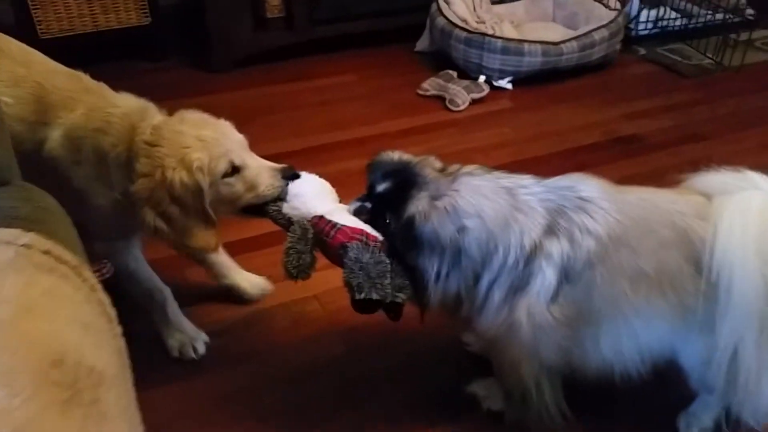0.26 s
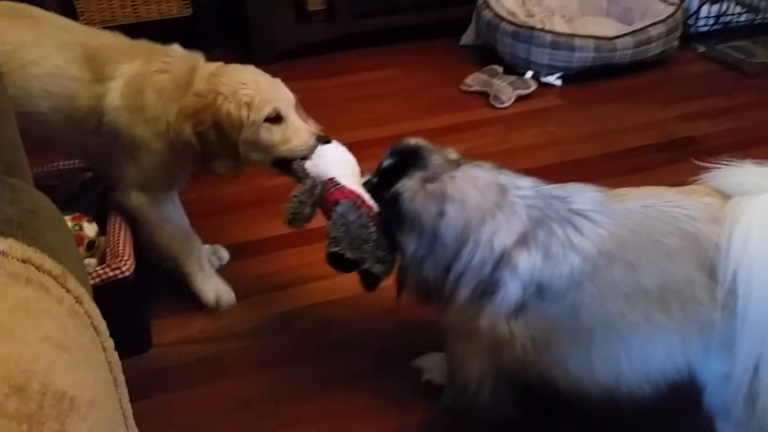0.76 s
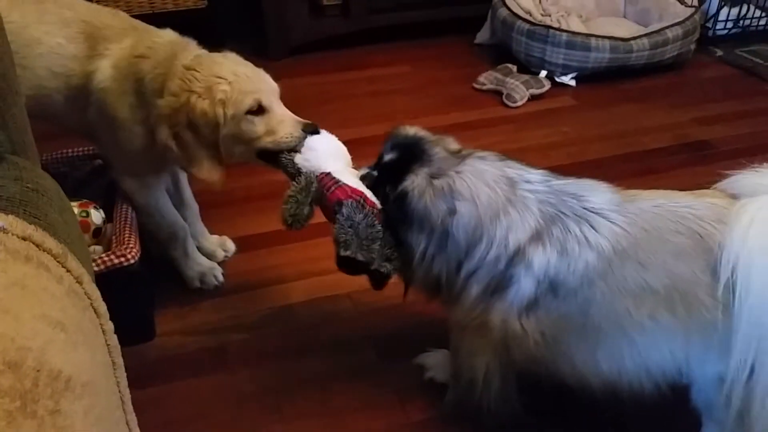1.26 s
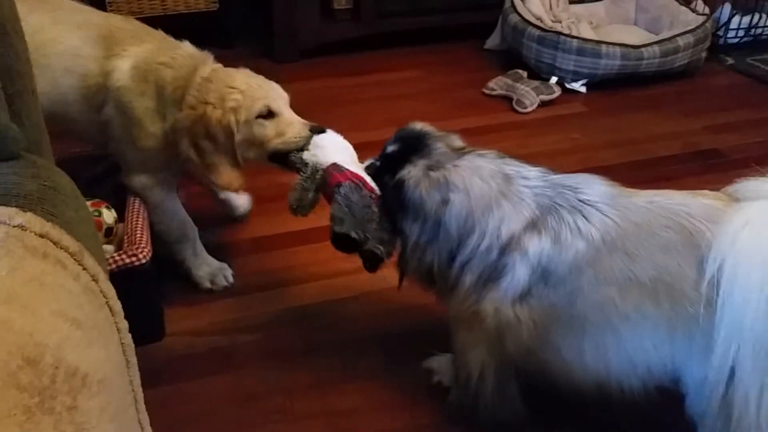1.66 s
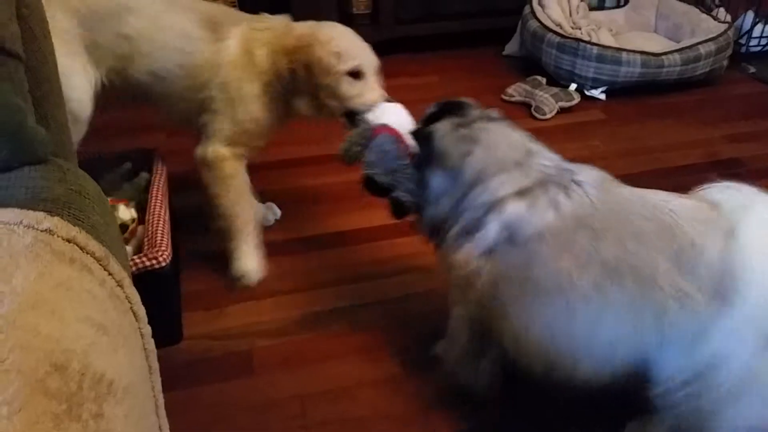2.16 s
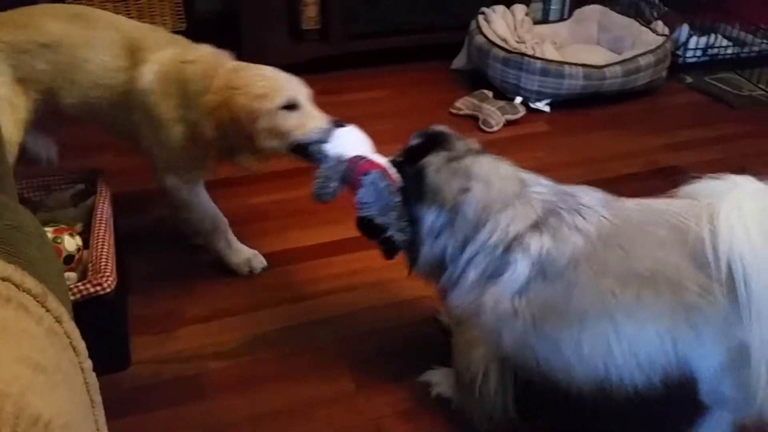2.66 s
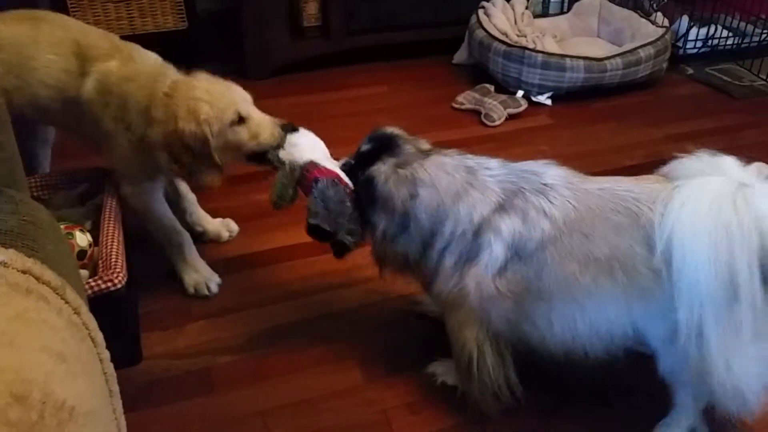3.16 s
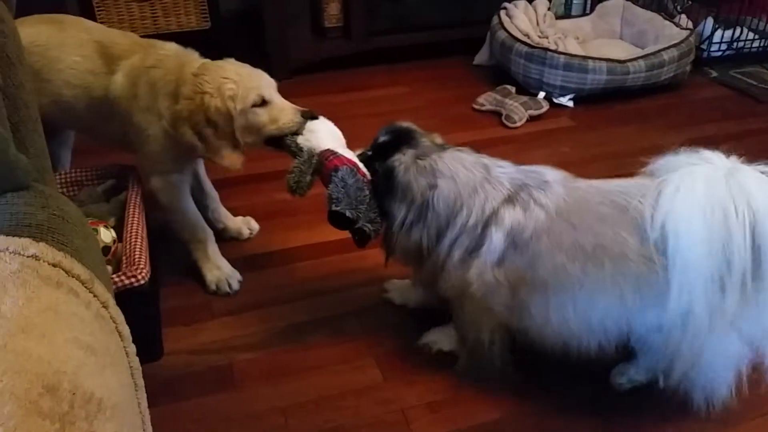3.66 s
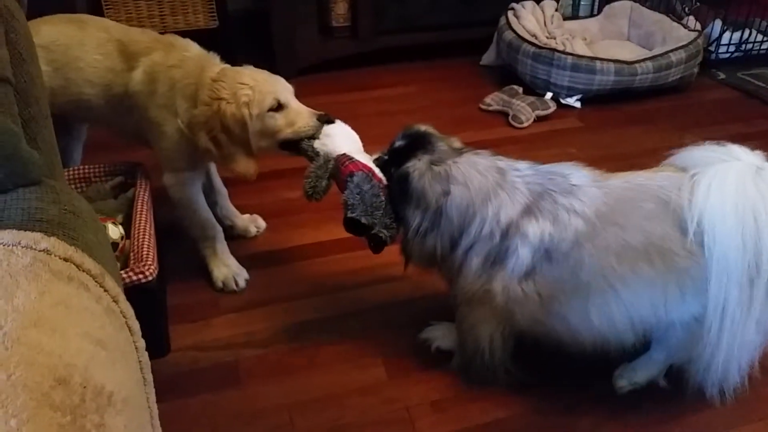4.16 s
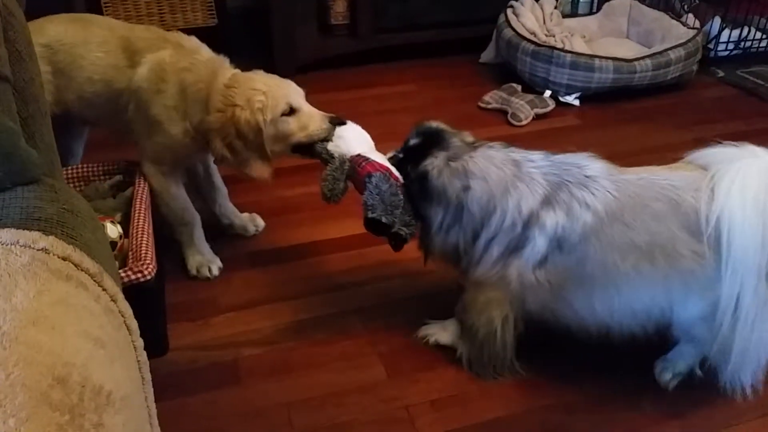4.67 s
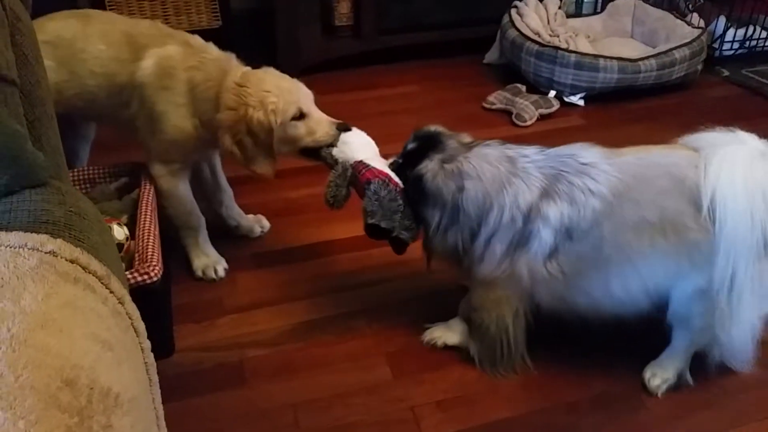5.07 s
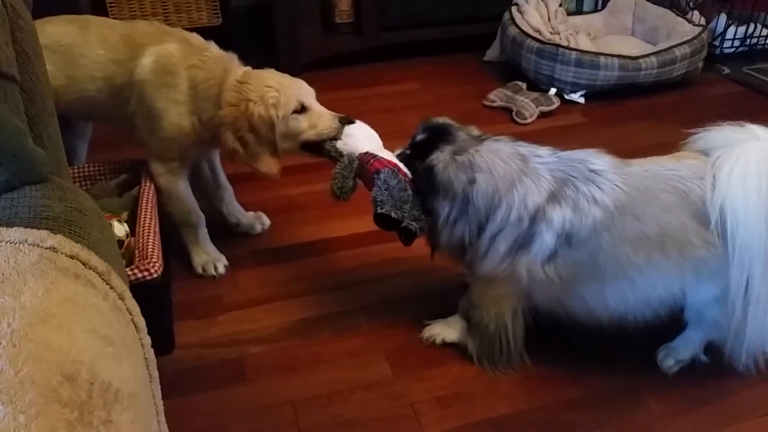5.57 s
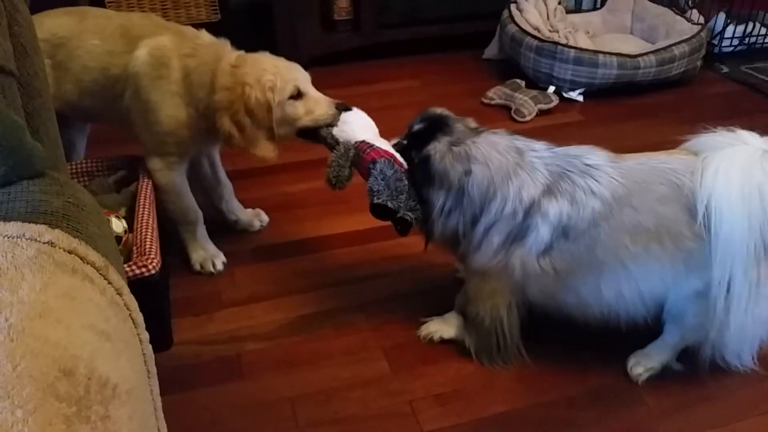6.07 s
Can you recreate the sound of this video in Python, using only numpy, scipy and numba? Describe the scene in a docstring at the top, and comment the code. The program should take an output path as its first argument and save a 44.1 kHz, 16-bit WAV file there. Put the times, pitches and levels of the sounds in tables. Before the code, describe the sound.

Low throaty play growls from two dogs overlap in a small room, with faint paw scuffs, soft rustling and microphone bumps.

```python
"""Two dogs growl over a plush toy on a wooden floor. One throbs about twenty times a second: its throat
gates the voice. The other growls evenly along pitch arches. Both: fold slaps and air puffs through throat
resonances. Claws tick and scuff (filtered noise), noses snort, fur and plush rustle, the room reflects.
The hand holding the phone bumps its left microphone (damped thuds) over grip rumble and quiet room tone."""
import sys
import numpy as np
from scipy import signal
from scipy.fft import rfft, irfft
from scipy.io import wavfile
from scipy.ndimage import uniform_filter1d
from numba import njit

SR = 44100
rng = np.random.default_rng(int(sys.argv[2]) if len(sys.argv) > 2 else 0)


def wav_record(signal):
    """Record a signal, one row per channel, as 16-bit PCM in the file named by sys.argv[1]."""
    frames = np.transpose(np.atleast_2d(signal))
    bounded = np.clip(frames, -1, 1)
    # unit amplitude maps onto the largest positive 16-bit level
    quanta = np.round(bounded * 32767).astype(np.int16)
    wavfile.write(sys.argv[1], SR, quanta)


N = 278271
T = np.arange(N) / SR  # s

# Room air spectrum: hz, relative_db
ROOM_TONE_SPECTRUM = [(25, -5), (60, -2), (110, 2.5), (200, -21.5), (400, -15.5), (1000, -26.5),
                      (2400, -37), (3300, -44.5), (4500, -35.5), (5700, -50), (7000, -83.5), (9500, -51),
                      (14500, -44.5)]
# Background hiss level, sinking near the end: time_s, level_db
AIR_LEVEL = [(0, -46), (2.6, -47.5), (5.85, -48), (6.1, -54), (6.3, -57)]
# Fur and plush rub spectrum: hz, relative_db
RUSTLE_SPECTRUM = [(150, -26.5), (450, 0), (1000, -0.5), (1700, -10), (2400, -10.5), (3400, -30),
                   (6000, -61.5)]
# Microphone difference: hz, left_minus_right_db
PORT_DIFFERENCE = [(120, -2), (300, -1.5), (650, 1.5), (1300, 1), (2400, 7.5), (4400, 0), (9000, 8.5),
                   (10500, 16.5), (12500, -2.5), (14500, -4.5)]
# Grip rumble spectrum: hz, relative_db
RUMBLE_SPECTRUM = [(20, -11.5), (45, 1), (75, -0.5), (120, -1.5), (250, -14), (600, -83)]
# Hand bumps on the phone: centre_s, level_db (before panning), pitch_hz
BUMPS = [(0.131, -16.5, 139), (0.167, -18, 148), (0.198, -18, 136), (0.216, -22, 107), (0.281, -28, 101),
         (0.331, -17.5, 129), (0.393, -20, 129), (0.442, -20, 113), (0.463, -19.5, 64.7),
         (0.469, -15, 179.7), (0.487, -18, 91), (1.058, -25.5, 65), (1.531, -21.5, 65.6), (2.212, -15, 91),
         (2.562, -27.5, 73.7), (2.645, -23, 69.8), (5.453, -20, 75.4), (5.957, -23.5, 80.14),
         (6.042, -25, 91.3)]
# Claw contact spectrum: hz, gain_db
CLAW_SPECTRUM = [(300, 19), (1200, 1), (2600, -6.5), (4000, -7.5), (6000, -20), (8200, -12), (11000, -6.5),
                 (14500, -8)]
# Claws and knocks on the boards: start_s, level_db (before the claw spectrum), lowpass_hz
TICKS = [(0.277, -43, 2460), (.597, -34.5, 12000), (2.196, -39, 14230), (2.2029, -35.5, 14800),
         (3.314, -36.5, 8750), (3.354, -35, 5930), (4.418, -40.5, 12030), (4.425, -40.5, 12200)]
# Sliding paws: start_s, length_s, level_db
SCUFFS = [(0.527, 0.29, -48.5), (1.989, 0.25, -50.5), (2.159, 0.42, -57.5), (3.263, 0.24, -51),
          (4.4, 0.081, -56), (5.862, 0.21, -63.5)]
# Nose air: start_s, length_s, start_level_db, resonance_hz
SNORTS = [(2.223, 0.32, -65.5, 2210), (2.632, 0.028, -55.5, 1266), (5.902, 0.17, -64, 1230),
          (6.152, 0.053, -58, 1262)]
# Air past teeth and toy: hz, relative_db
HISS_SPECTRUM = [(2000, -7.5), (3300, -10), (4500, 10), (5700, 4.5), (7000, -49.5), (9300, 9), (10300, 2.5),
                 (11900, -3.5), (13400, 11), (14500, 13)]
# Even dog's throat resonances: hz, relative_db
EVEN_THROAT = [(60, -22), (102, 4), (220, 3.5), (310, -5.5), (405, -18.5), (510, -18.5), (620, -18.5),
               (760, -13.5), (1050, -15.5), (1330, -14.5), (1650, -37), (1950, -37.5), (2300, -45.5),
               (2550, -46.5), (2950, -46), (3400, -50), (6000, -92)]
# Even dog's pitch arches: start_s, crest_s, end_s, start_hz, crest_hz, end_hz,
# crest_level_db, mouth_opening_db, snarl_db (at the crest)
EVEN_GROWLS = [(-.1, -0.021, 0.18, 128, 133.7, 104.8, -28.5, 2, -32.5),
               (0.549, 0.628, 0.79, 110.7, 126, 96.3, -31, 2.5, -26),
               (1.031, 1.223, 1.3, 100.6, 111.8, 101.7, -34.5, -1.5, -32),
               (1.679, 1.918, 2.167, 119.3, 146, 108.5, -27.5, 4, -25.5),
               (2.653, 2.82, 3.03, 105.5, 109.8, 89.7, -32.5, 2, -24.5),
               (3.021, 3.177, 3.32, 87.14, 98.9, 78.93, -36, 0, -30.5),
               (3.9, 4.17, 4.5, 86.97, 90.16, 86.7, -32.5, -9, -51),
               (4.724, 5.063, 5.33, 106, 119.1, 95.4, -30.5, 0, -31),
               (5.282, 5.328, 5.7, 95.1, 94.03, 86.8, -32.5, -4.5, -38.5),
               (5.622, 5.773, 5.885, 97.3, 111.4, 101.4, -33, -1, -37.5),
               (6.152, 6.342, 6.72, 91.9, 139.7, 120.5, -27, 0, -32.5)]
# Throbbing dog's throat resonances: hz, relative_db
THROB_THROAT = [(70, -18.5), (132, 3), (172, 8.5), (215, 5.5), (290, -3.5), (410, -20), (510, -12),
                (615, -7.5), (730, -9.5), (860, -17.5), (1230, -25), (1500, -19.5), (1850, -39),
                (2500, -47.5), (3200, -65), (6000, -97)]
# Throbbing dog's mouth opening: time_s, opening_db
THROB_MOUTH = [(.6, 0.5), (2.48, -1.5), (3.6, 0.5), (5.15, 4), (5.85, -7)]
# Throb rate, one list per long growl: time_s, throbs_per_s
THROB_RATES = [
    [(0.585, 20.71), (0.748, 24.88), (0.82, 19.84), (1.043, 19.17), (1.113, 20.75), (1.199, 19.11),
     (1.445, 18.46), (1.562, 18.64), (1.633, 17.33), (1.822, 20.19), (1.904, 16.84), (1.982, 22.96),
     (2.053, 22.66), (2.21, 20.2), (2.285, 14.21), (2.48, 17.29)],
    [(3.3, 22.12), (3.557, 21.86), (3.627, 20.19), (3.805, 18.95), (4.0, 15.32), (4.08, 20.28),
     (4.348, 15.93), (4.48, 18.57), (4.568, 17.64), (4.899, 16.35), (4.97, 18.9), (5.219, 18.2),
     (5.472, 14.3), (5.632, 17.97), (5.717, 14.32), (5.865, 15.67)],
]
# Voice course, one list per long growl: time_s, base_pitch_hz, relative_level_db
THROB_GROWLS = [
    [(.583, 119.6, -25.5), (.66, 137.8, -24), (.8, 121.2, -24), (1.02, 110, -25.5), (1.12, 109.6, -22),
     (1.3, 130.7, -22), (1.45, 121.2, -25), (1.62, 116.9, -23), (1.94, 142.8, -23.5), (2.19, 128.4, -20.5),
     (2.28, 111.5, -26.5), (2.41, 110.5, -27), (2.48, 100.8, -34)],
    [(3.298, 126.4, -26), (3.39, 134.1, -23), (3.66, 132, -24.5), (4.0, 127.1, -26.5), (4.35, 122.7, -26.5),
     (4.55, 125.3, -26), (4.7, 113.4, -28), (4.87, 110.6, -28.5), (5.1, 123.2, -25.5), (5.33, 117.9, -26),
     (5.58, 105.5, -29), (5.865, 105.9, -26.5)],
]

TOP_HZ = 14650
GRIP_DB, GRIP_SETTLE_DB_PER_S = -31, 2  # the grip rumbles less as the hand settles
BUMP_PAN_DB = 35  # left minus right
LOW_HZ, LOW_ROUGH, ROUGH_PER_OCTAVE = 91.9, .19, .95  # even dog: the higher, the rougher
SWELL_DB_PER_OCTAVE = 37  # even dog: level follows pitch relative to the crest
NASAL_HZ, NASAL_HZ_PER_OCTAVE, NASAL_WIDTH_HZ = 2228, 377, 335  # NASAL_HZ holds at LOW_HZ
THROB_ROUGH, ONSET_ROUGH, ONSET_S = .35, .42, .16  # base, extra at each onset, its decay


def undb(db):
    """Decibels to gain."""
    return 10 ** (np.asarray(db) / 20)


def unit(x):
    """Scale to rms 1."""
    return x / np.sqrt(np.mean(x ** 2) + 1e-18)


def curves(rows):
    """Table columns joined by straight lines in time."""
    time_s, *columns = np.transpose(rows)
    return [np.interp(T, time_s, column) for column in columns]


def colour(x, points):
    """Minimum-phase filter through (hz, db) points, by folding the cepstrum."""
    size = 8192
    hz, db = np.transpose(points)
    log_hz = np.log(np.fft.rfftfreq(size, 1 / SR) + 1)
    cepstrum = irfft(np.log(undb(np.interp(log_hz, np.log(hz), db))))
    cepstrum[1:size // 2] *= 2
    cepstrum[size // 2 + 1:] = 0
    impulse = irfft(np.exp(rfft(cepstrum)))
    return signal.fftconvolve(x, impulse)[:len(x)]


def coloured_noise(points):
    """Noise of rms 1 with a given spectrum."""
    return unit(colour(rng.standard_normal(N), points))


def above(x, hz):
    """Zero-phase high-pass."""
    return signal.sosfiltfilt(signal.butter(2, hz, "high", fs=SR, output="sos"), x)


def walk(rate_hz):
    """Smoothed random steps of rms 1."""
    step = int(SR / rate_hz)
    steps = np.repeat(rng.standard_normal(N // step + 2), step)
    return unit(uniform_filter1d(steps, step)[:N])


def gate(start_s, end_s, attack_s, release_s):
    """Linear attack, hold and release."""
    return np.clip(np.minimum((T - start_s) / attack_s, (end_s - T) / release_s), 0, 1)


def pan(db):
    """Left and right gains with a mean of 1."""
    left = undb(db)
    return 2 * np.array([[left], [1]]) / (1 + left)


def add(out, start_s, sound):
    """Mix a stereo sound in at a time."""
    i = max(int(start_s * SR), 0)
    out[:, i:i + sound.shape[1]] += sound[:, :max(N - i, 0)]


@njit
def resonance(x, hz, width_hz):
    """State-variable band-pass with a moving centre, gain 1 there."""
    y, band, low = np.empty(len(x)), 0., 0.
    for i in range(len(x)):
        g, damping = np.tan(np.pi * hz[i] / SR), width_hz / hz[i]
        v = (band + g * (x[i] - low)) / (1 + g * (g + damping))
        band, low, y[i] = 2 * v - band, low + 2 * g * v, damping * v
    return y


def narrow(x, hz, width_hz):
    """A resonance applied twice for steep sides, scaled to rms 1."""
    hz = hz * np.ones(N)
    once = resonance(x, hz, 1. * width_hz)
    return unit(resonance(once, hz, 1. * width_hz))


def room_tone():
    """Quiet air of the house, independent in each channel."""
    noise = np.array([coloured_noise(ROOM_TONE_SPECTRUM) for _ in range(2)])
    return undb(curves(AIR_LEVEL)[0]) * noise


def reflections(x, t60_s=.36, late_t60_s=.4, late_db=-17, treble_loss=.25, wet_db=-3,
                bass_wet_db=-12, bass_hz=450, gap_s=.0018):
    """Floor and furniture scatter sound into decaying noise tails; channels differ most in the highs."""
    t = T[:SR // 2]
    early, late = (np.exp(-np.log(1000) * t / s) for s in (t60_s, late_t60_s))
    decay = (early + undb(late_db) * late) * (t > gap_s)
    tails = decay * rng.standard_normal((2, len(t))) / np.sqrt(np.sum(decay ** 2))
    tails = tails - treble_loss * above(tails, 2400)
    upper = above(tails, bass_hz)
    mid, side = undb(bass_wet_db) * (tails - upper) + undb(wet_db) * upper
    side = .6 * side + .95 * above(side, 1500)
    mid, side = (signal.fftconvolve(x, tail)[:N] for tail in (mid, side))
    return mid + side * np.array([[1], [-1]])


def room(x, count=4):
    """As the dogs move about, one pattern of reflections gives way to the next."""
    place = np.linspace(0, count - 1, N)
    weights = [np.cos(np.pi / 2 * np.clip(place - k, -1, 1)) for k in range(count)]
    return x + sum(reflections(x * weight) for weight in weights)


def ports(x):
    """The left microphone favours upper resonances, the right one the lows and the very top."""
    halves = [[(hz, sign * db / 2) for hz, db in PORT_DIFFERENCE] for sign in (1, -1)]
    return np.array([colour(channel, half) for channel, half in zip(x, halves)])


def rustle(db=-63, uneven_db=6.5, rate_hz=14):
    """Fur and plush rub in fits and starts as the dogs shift their grip."""
    rubs = np.array([coloured_noise(RUSTLE_SPECTRUM) for _ in range(2)])
    air_change_db = curves(AIR_LEVEL)[0] - AIR_LEVEL[0][1]
    return rubs * undb(db + uneven_db * walk(rate_hz) + air_change_db)


def hand(cycles=.33, case_hz=260, case_s=.0011, case_db=-18, right_db=-6):
    """Finger bumps: a dull thud of about one cycle and a brief case knock, over low grip rumble."""
    out, t = np.zeros((2, N)), T[:SR // 10] - T[SR // 20]
    knock = undb(case_db) * np.exp(-.5 * (t / case_s) ** 2) * np.sin(2 * np.pi * case_hz * t)
    for centre_s, db, hz in BUMPS:
        thud = np.exp(-.5 * (t * hz / cycles) ** 2) * np.cos(2 * np.pi * hz * t)
        # quicker bumps reach the case more
        bump = thud + (hz / 130) ** 2 * knock
        add(out, centre_s + t[0], undb(db) * pan(BUMP_PAN_DB) * bump)
    left, own = (coloured_noise(RUMBLE_SPECTRUM) for _ in range(2))
    # the deepest rumble stays on the held side
    right = undb(right_db) * above(.31 * left + own, 50)
    return out + undb(GRIP_DB - GRIP_SETTLE_DB_PER_S * T) * np.array([left, right])


def scuff_grains():
    """Fine grains: noise of random strength through the claw spectrum."""
    strength_db = 3.6 * np.minimum(rng.exponential(size=N), 2 * np.pi)
    return unit(colour(rng.standard_normal(N) * undb(strength_db), CLAW_SPECTRUM))


def paws(click_s=.0012, tail_s=.015, tail_db=-13):
    """Claws strike the boards with a short crack; sliding paws make a patch of fine grains."""
    out, t = np.zeros((2, N)), T[:SR // 10]
    decay = np.exp(-t / click_s) + undb(tail_db) * np.exp(-t / tail_s)
    for start_s, db, lowpass_hz in TICKS:
        # a softer contact loses the treble
        contact = signal.butter(2, lowpass_hz, fs=SR, output="sos")
        cracks = signal.sosfilt(contact, decay * rng.standard_normal((2, len(t))))
        add(out, start_s, undb(db) * np.array([colour(crack, CLAW_SPECTRUM) for crack in cracks]))
    grains = np.array([scuff_grains() for _ in range(2)])
    for start_s, length_s, db in SCUFFS:
        out += undb(db) * grains * np.sin(np.pi * np.clip((T - start_s) / length_s, 0, 1))
    return out


def snorts(width_hz=420, edge_s=.012, fade_db=7):
    """Air forced through a dog's nose rings one resonance and dies away."""
    out = np.zeros(N)
    for start_s, length_s, db, hz in SNORTS:
        level_db = db - fade_db * np.clip((T - start_s) / length_s, 0, 1)
        flow = undb(level_db) * gate(start_s, start_s + length_s, edge_s, edge_s)
        out += flow * narrow(rng.standard_normal(N), hz, width_hz)
    return out


def folds(hz, rough, jitter, waver, puff_s, restarts=(0,), shimmer_db=3.2):
    """Vocal folds slap shut once a cycle, unevenly when rough; each slap starts a decaying air puff."""
    first, pause = .6, .1  # cycles: delay after a restart, silence before the next
    rough = np.clip(rough, .08, 1)
    phase = np.cumsum(hz * (1 + waver * rough * walk(70))) / SR
    bounds = phase[[*restarts, -1]]
    cycle = np.concatenate([np.arange(a + first, b - pause) for a, b in zip(bounds, bounds[1:])])
    late, size = rng.standard_normal((1200, 2))[:len(cycle)].T
    uneven = np.interp(cycle, phase, rough)
    at = np.interp(cycle + jitter * uneven * late, phase, np.arange(N))
    slaps = np.zeros(N)
    slaps[at.astype(int)] = -undb(shimmer_db * uneven * np.clip(size, -2, 2))
    puff_flow = signal.lfilter([1], [1, -np.exp(-1 / (puff_s * SR))], slaps)
    return unit(slaps), unit(puff_flow * rng.standard_normal(N))


def restless(x, throat, stretch=.035, tugs_per_s=6):
    """The throat stretches and shortens as the dog tugs, so its resonances wander."""
    long, short = (colour(x, [(hz * k, db) for hz, db in throat]) for k in (1 - stretch, 1 + stretch))
    return long + (.5 + .5 * np.tanh(walk(tugs_per_s))) * (short - long)


def voice(slaps, puffs, rough, throat, mouth_db, rasp, chest_rasp, snarl, hiss_db, lift=1.):
    """Slaps and rasping air ring the throat; an open mouth lets out the upper resonances, highest most."""
    rough = np.clip(rough, .08, 1)
    high, air = above(slaps, 390), above(puffs, 330)
    low = slaps - high + chest_rasp * rough * (puffs - air)
    raspy = (high + rasp * rough * air) / np.sqrt(1 + (rasp * rough) ** 2)
    sound = unit(restless(low + raspy, throat))
    upper = above(sound, 670)
    chest = sound - upper
    # pushing harder also shifts the lowest resonance upwards
    sound = sound + lift * (rough - .4) * (2 * above(chest, 190) - chest)
    sound = sound + (undb(mouth_db) - 1) * upper
    sound = sound + (undb(snarl * mouth_db) - 1) * above(sound, 2500)
    return sound + undb(hiss_db + .86 * mouth_db) * unit(colour(puffs, HISS_SPECTRUM))


def nasal_edge(slaps, puffs, hz, upper_db=-5):
    """Bared teeth let out two narrow nasal resonances, rung by every slap and rising with the pitch."""
    nasal_hz = NASAL_HZ + NASAL_HZ_PER_OCTAVE * np.log2(hz / LOW_HZ)
    lower = narrow(slaps + .57 * puffs, nasal_hz, NASAL_WIDTH_HZ)
    upper = narrow(slaps + .5 * puffs, 1.143 * nasal_hz, .93 * NASAL_WIDTH_HZ)
    return unit(lower + undb(upper_db) * upper)


def even_dog(attack_s=.024, release_s=.023, jaw_s=.063, bare_db=5):
    """Growls swell and sink along pitch arches; cleaner when low, ragged when pushed higher."""
    flow, hz = np.zeros(N), np.full(N, 1. * LOW_HZ)
    mouth_db, snarl_db = np.zeros(N), np.zeros(N)
    for start_s, crest_s, end_s, start_hz, crest_hz, end_hz, db, opening_db, teeth_db in EVEN_GROWLS:
        before = np.interp(T, [start_s, crest_s], [1, 0]) ** 2
        after = np.interp(T, [crest_s, end_s], [0, 1]) ** 2
        arch_hz = crest_hz + (start_hz - crest_hz) * before + (end_hz - crest_hz) * after
        level_db = db + SWELL_DB_PER_OCTAVE * np.log2(arch_hz / crest_hz)
        flow = np.maximum(flow, gate(start_s, end_s, attack_s, release_s) * undb(level_db))
        begun = T >= start_s
        hz = np.where(begun, arch_hz, hz)
        mouth_db = np.where(begun, opening_db, mouth_db)
        snarl_db = np.where(begun, teeth_db - bare_db * (before + after), snarl_db)
    mouth_db, snarl_db = uniform_filter1d([mouth_db, snarl_db], int(jaw_s * SR))
    rough = LOW_ROUGH + ROUGH_PER_OCTAVE * np.log2(hz / LOW_HZ)
    slaps, puffs = folds(hz, rough, jitter=.07, waver=.045, puff_s=.0025)
    edge = undb(snarl_db) * nasal_edge(slaps, puffs, hz)
    body = voice(slaps, puffs, rough, EVEN_THROAT, mouth_db, rasp=2.1, chest_rasp=.65, snarl=.5,
                 hiss_db=snarl_db - 10)
    return flow * (edge + body)


def throbbing_dog(flutter=.07, stray=.032, scatter_db=1., depth=.66, attack_s=.015, release_s=.021, db=-4.):
    """Loose throat tissue snaps open, lets a few even slaps of the voice through and sinks shut."""
    opens, closes, shut_at, shut_scatter = .2, .38, .86, .05  # fractions of a throb
    restarts = [0]
    flow, hz, rough = np.zeros(N), np.full(N, 1. * LOW_HZ), np.full(N, THROB_ROUGH)
    for growl, rates in zip(THROB_GROWLS, THROB_RATES):
        start_s, end_s = growl[0][0], growl[-1][0]
        pitch_hz, level_db = curves(growl)
        phase = np.cumsum(curves(rates)[0] * (T >= rates[0][0])) / SR
        # the folds start afresh with each throb
        restarts += list(np.flatnonzero(np.diff(np.ceil(phase)) * (T[1:] < end_s)))
        bend, size, hold = rng.standard_normal((200, 3))[phase.astype(int)].T
        opening = phase % 1 / opens
        closing = (shut_at + shut_scatter * hold - phase % 1) / closes
        throb = np.clip(np.minimum(opening, closing), 0, 1)
        strength = undb(level_db + scatter_db * size * throb) * (1 - depth * (1 - throb))
        flow = flow + gate(start_s, end_s, attack_s, release_s) * strength
        begun = T >= start_s
        hz = np.where(begun, pitch_hz * (1 + flutter * (throb - .5) + stray * bend), hz)
        onset = np.exp(-abs(T - start_s) / ONSET_S)
        rough = np.where(begun, THROB_ROUGH + ONSET_ROUGH * onset, rough)
    slaps, puffs = folds(hz, rough, jitter=.072, waver=.05, puff_s=.004, restarts=restarts)
    body = voice(slaps, puffs, rough, THROB_THROAT, curves(THROB_MOUTH)[0], rasp=1.7, chest_rasp=.45,
                 snarl=.3, hiss_db=-39)
    return undb(db) * flow * body


def scene():
    """Dogs in the room, paws, fur and air through both microphones; the hand acts on the phone directly."""
    dogs = room(throbbing_dog() + even_dog() + snorts())
    return ports(dogs + paws() + rustle() + room_tone()) + hand()


def record(dry):
    """The phone cuts the top with a steep elliptic low-pass."""
    return signal.sosfilt(signal.ellip(10, .2, 80, TOP_HZ, fs=SR, output="sos"), dry)


dry = scene()
out = record(dry)
wav_record(out)
```